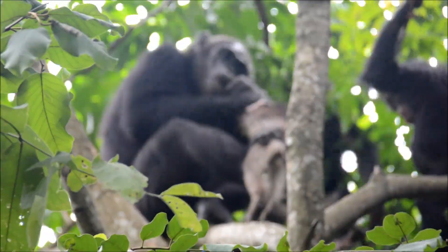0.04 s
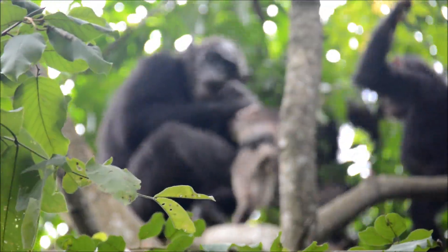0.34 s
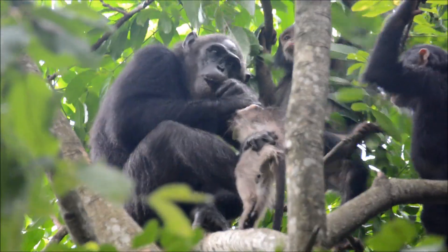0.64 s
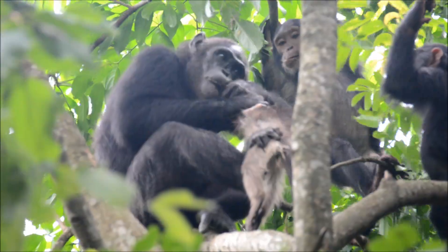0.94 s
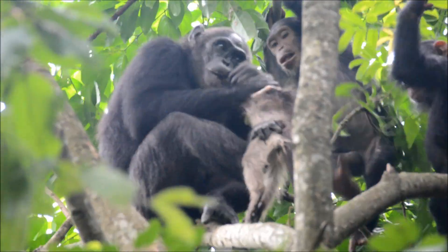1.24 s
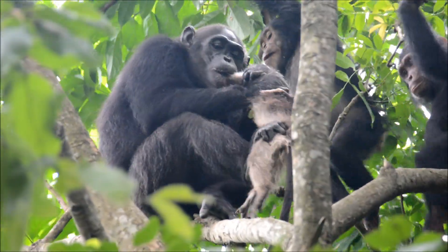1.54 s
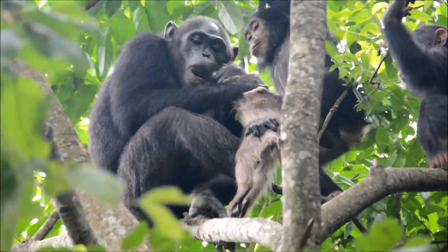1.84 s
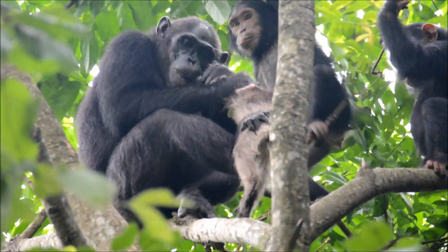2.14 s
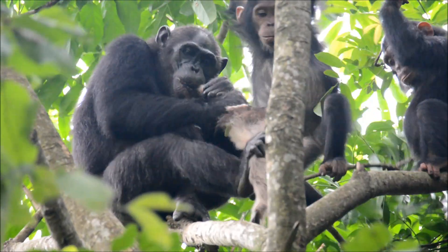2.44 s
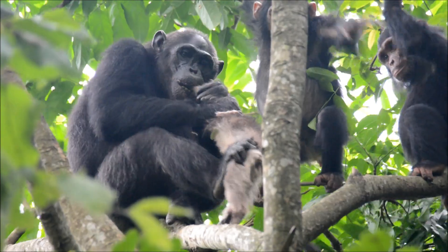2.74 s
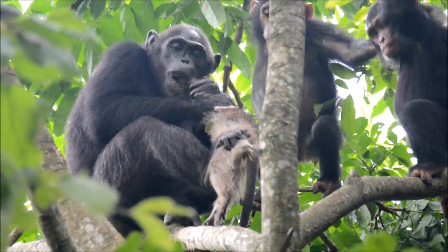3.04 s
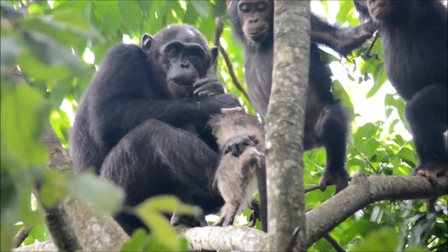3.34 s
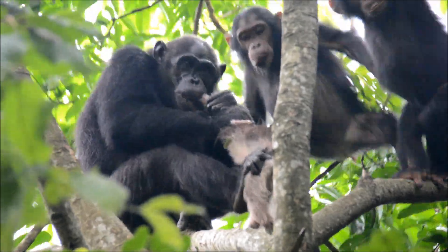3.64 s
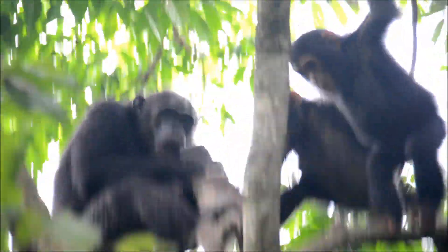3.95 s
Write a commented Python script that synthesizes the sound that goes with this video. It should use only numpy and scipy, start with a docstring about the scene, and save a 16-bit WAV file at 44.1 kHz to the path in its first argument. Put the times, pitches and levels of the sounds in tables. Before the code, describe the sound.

Twigs crack and foliage swishes under clambering chimpanzees, over high, pulsing forest insects.

```python
"""Chimpanzees clambering in a forest tree

Leaves rustle and crackle as the animals shift their weight. Twigs snap in bursts of tearing fibres
and a branch knocks now and then, both with a short tail scattered by the trees. Behind them the far
canopy stirs, insects buzz in overlapping phrases near 6 and 7 kHz, and a distant bird whistles."""
import sys
import numpy as np
from scipy import signal
from scipy.fft import rfft, irfft, next_fast_len
from scipy.io import wavfile
from scipy.ndimage import uniform_filter1d, map_coordinates

SR = 44100
rng = np.random.default_rng(int(sys.argv[2]) if len(sys.argv) > 2 else 0)


def inscribe(sig):
    """Save sig as 16-bit PCM at rate SR to the path in sys.argv[1].

    A 1-D sig is mono; a 2-D sig holds one channel per row.
    Samples are clipped to [-1, 1] before scaling.
    """
    pcm = np.round(np.clip(np.atleast_2d(sig).T, -1, 1) * 32767)
    wavfile.write(sys.argv[1], SR, pcm.astype(np.int16))


N = 176400


def amp(db):
    """Decibels to gain."""
    return 10 ** (np.asarray(db) / 20)


def unit(x):
    """Scale to rms 1."""
    return x / np.sqrt(np.mean(x ** 2) + 1e-20)


def along(points, hz):
    """Read a curve of (Hz, value) points on a log frequency axis."""
    freqs, values = np.transpose(points)
    return np.interp(np.log(hz + 1), np.log(freqs + 1), values)


def wobble(rate):
    """A smooth random curve with `rate` knots a second."""
    return map_coordinates(rng.standard_normal(2000), [np.arange(N) * rate / SR], mode="mirror")


def filtered(x, response):
    """Equalise x with a gain given as a function of Hz."""
    n = x.shape[-1]
    size = next_fast_len(n + 8192)
    return irfft(rfft(x, size) * response(np.fft.rfftfreq(size, 1 / SR)), size)[..., :n]


# Stereo image of the near tree. Each row: frequency in Hz, left-right likeness from 0 to 1.
TREE_LIKENESS = [(60, .75), (200, 0.94), (500, 0.98), (1200, 1), (2500, 1), (5500, .87), (9000, 0.74),
                 (14000, 0.42)]


def spread(pair, spectrum, tilt_db=0, likeness=TREE_LIKENESS):
    """Two unrelated signals become coloured, partly alike stereo of rms 1."""
    angle = lambda hz: np.arccos(np.clip(along(likeness, hz), -1, .995)) / 2
    colour = lambda hz: amp(along(spectrum, hz) + tilt_db * np.log2(1 + hz / 500))
    mid, side = filtered(pair, lambda hz: colour(hz) * [np.cos(angle(hz)), np.sin(angle(hz))])
    return unit(np.array([mid + side, mid - side]))


def leaf_contacts(spectrum, likeness, patchy_db, crackles_per_s=1500, crackle_db=-7):
    """Countless leaves touching: a patchy rush with single crackles standing out."""
    hits = rng.random(N) < crackles_per_s / SR
    sizes = amp(3 * np.minimum(rng.exponential(size=N), 3))
    crackles = unit(hits * sizes * rng.choice([-1, 1], (2, N)))
    bands = signal.stft(rng.standard_normal((2, N)) + amp(crackle_db) * crackles, nperseg=512)[2]
    patches = uniform_filter1d(rng.standard_normal(bands.shape[1:]), size=4, axis=0)  # across pitch
    patches = unit(uniform_filter1d(patches, size=7, axis=1))  # across time
    depth_db = patchy_db / (1 + np.fft.rfftfreq(512, 1 / SR)[:, None] / 5000)  # smoother in the treble
    rush = signal.istft(bands * amp(depth_db * patches), nperseg=512)[1][:, :N]
    return spread(rush, spectrum, likeness=likeness)


def phrases(rows, width_hz, rise_hz_per_s, skirt_db, edge, side_db=-12.5):
    """Fuzzy rising tones of narrow noise that swell and fade; a higher edge gates them harder."""
    out, t = np.zeros((2, N)), np.arange(N) / SR
    core = lambda f: np.exp(-.25 * (f / width_hz) ** 2)
    skirt = lambda f: amp(skirt_db) * np.exp(-.5 * (f / width_hz / 4) ** 2)
    for middle, length, hz, db in rows:
        first = max(0, round((middle - .5) * SR))
        offset = t[first:first + SR] - middle
        fuzz = filtered(rng.standard_normal((2, 2, SR)), lambda f: core(f) + skirt(f))
        fuzz = unit(fuzz)[..., :len(offset)]
        phase = 2 * np.pi * (hz * offset + rise_hz_per_s * offset ** 2 / 2)
        swell = amp(db) * np.exp(-np.abs(2 * offset / length) ** edge)
        mid, side = swell * (fuzz[0] * np.cos(phase) + fuzz[1] * np.sin(phase))
        out[:, first:first + SR] += [mid + amp(side_db) * side, mid - amp(side_db) * side]
    return out


# Stereo image of the surrounding forest. Each row: frequency in Hz, left-right likeness from 0 to 1.
FAR_LIKENESS = [(60, 0.86), (200, 0.48), (500, 0.56), (1200, 0.73), (4500, 0.56), (9000, 0.54),
                (15000, 0.13)]
# Tone of the far canopy. Each row: frequency in Hz, relative level in dB.
CANOPY_EQ = [(25, -44), (55, -54), (75, -47), (90, -9.5), (108, -22), (135, -13), (200, -12), (350, -7),
             (650, -3.5), (1100, -2.5), (2000, -2.5), (3200, -2.5), (4700, -6.5), (8500, -9.5),
             (12000, -12), (15800, -12.5)]


def far_canopy():
    """A quiet, gently wavering bed of distant leaves."""
    return amp(-54 + .9 * wobble(16)) * leaf_contacts(CANOPY_EQ, FAR_LIKENESS, patchy_db=1.43)


# Tone of the distant insects. Each row: frequency in Hz, relative level in dB.
CHORUS_EQ = [(4000, -48), (5200, -15.5), (5700, -3), (6200, -7), (6900, -10), (7500, -20), (8300, -29)]


def insect_chorus():
    """Distant insects merge into a wavering band of hiss."""
    hiss = spread(rng.standard_normal((2, N)), CHORUS_EQ, likeness=FAR_LIKENESS)
    return amp(-55 + 1.5 * wobble(5.8)) * hiss


# Bird calls. Each row: midpoint in seconds, length in seconds, pitch in Hz, level in dB.
BIRD_CALLS = [(.055, 0.17, 3170, -56), (.657, .022, 2305, -50), (1.29, 0.2, 3200, -64.5),
              (3.187, 0.044, 2920, -49)]


def far_bird():
    """Thin rising whistles, blurred by distance."""
    return phrases(BIRD_CALLS, width_hz=34, rise_hz_per_s=900, skirt_db=-32, edge=3.5)


# Insect buzzes. Each row: midpoint in seconds, length in seconds, pitch in Hz, level in dB.
BUZZ_PHRASES = [(.03, 0.056, 5780, -56.5), (.31, 0.29, 5740, -50), (.46, 0.1, 6140, -58),
                (.75, .17, 5770, -56), (.985, 0.12, 5830, -49.5), (1.17, 0.28, 5710, -52),
                (1.42, .12, 6100, -58), (1.63, 0.25, 5750, -50.5), (1.79, 0.15, 5650, -56),
                (2.19, 0.24, 5730, -51), (2.42, 0.24, 5790, -52.5), (2.74, 0.17, 5700, -50),
                (2.88, 0.084, 5640, -56), (3.02, 0.14, 6010, -50), (3.23, 0.21, 5770, -49),
                (3.46, 0.21, 5780, -61), (3.88, 0.23, 5740, -50.5)]
# Insect lisps. Each row: midpoint in seconds, length in seconds, pitch in Hz, level in dB.
LISP_PHRASES = [(.14, .17, 7200, -57.5), (.35, .25, 6770, -58), (.64, 0.14, 7200, -57),
                (.84, 0.16, 6900, -56), (1.08, 0.16, 7200, -57.5), (1.32, 0.13, 6780, -56.5),
                (1.49, 0.22, 7120, -56), (1.85, 0.18, 6900, -59), (2.39, 0.25, 6920, -53),
                (2.87, .16, 6940, -52.5), (3.27, 0.17, 6820, -52.5), (3.76, 0.22, 7060, -54.5)]


def near_insects():
    """Lightly fluttering buzzes overlap with higher, hissier lisps."""
    buzz = phrases(BUZZ_PHRASES, width_hz=74, rise_hz_per_s=478, skirt_db=-5.5, edge=4.6)
    lisp = phrases(LISP_PHRASES, width_hz=300, rise_hz_per_s=42, skirt_db=-36, edge=3)
    flutter = amp(.3 * wobble(110))
    return buzz * flutter + lisp


# Forest reverb. Each row: frequency in Hz, seconds to fall 60 dB.
FOREST_DECAY = [(200, 0.75), (2000, 0.53), (12000, 0.38)]


def forest_reverb(x):
    """Trunks and leaves scatter a short tail that darkens as it dies."""
    noise = spread(rng.standard_normal((2, SR // 2)), [(100, 0), (10000, 0)])
    hz, t, bands = signal.stft(noise, SR, nperseg=256)
    decay = amp(-60 * t / along(FOREST_DECAY, hz)[:, None])
    tail = signal.istft(bands * decay, SR, nperseg=256)[1]
    return signal.fftconvolve(x.mean(axis=0)[None], tail / np.linalg.norm(tail[0]), axes=1)[:, :N]


# Branch knocks. Each row: start in seconds, level in dB, pitch in Hz, seconds to fall 60 dB.
BRANCH_HITS = [(0.801, -45, 1320, 0.03), (0.859, -50.5, 1120, 0.069), (1.219, -47, 1040, .035),
               (1.662, -41.5, 988, 0.11), (1.892, -49.5, 530, 0.094), (2.395, -43, 1515, 0.039),
               (2.672, -48.5, 683, 0.058), (2.695, -49, 1120, 0.04), (3.288, -41.5, 1363, 0.052)]
# Resonances of a branch. Each row: multiple of the pitch, relative level in dB.
BRANCH_MODES = [(0.999, 1.5), (1.9, -4), (2.74, -1)]


def branch_knocks(jitter_radians=.19, attack_s=.00054):
    """Thick wood rings briefly and a little roughly, its upper modes dying first."""
    out, t = np.zeros((2, N + SR)), np.arange(SR // 4) / SR
    attack = 1 - np.exp(-t / attack_s)
    for start, db, hz, t60 in BRANCH_HITS:
        for ratio, mode_db in BRANCH_MODES:
            phase = ratio * (2 * np.pi * hz * t + jitter_radians * wobble(373)[:len(t)])
            decay = amp(db + mode_db - 60 * t * ratio / t60)
            out[:, round(start * SR):][:, :len(t)] += attack * decay * np.sin(phase)
    return out[:, :N]


# Twig snaps. Each row: start in seconds, level in dB, treble tilt in dB per octave,
# seconds to fall 60 dB.
TWIG_BREAKS = [(.1935, -36.5, 1, .014), (.197, -46.5, -3.5, 0.084), (.2985, -38.5, -1.5, .015),
               (.352, -43, 5.5, 0.012), (0.456, -47, 0, .04), (.463, -44, -2, 0.031),
               (0.7481, -38.5, 0.5, 0.019), (.788, -39, 2, 0.03), (.792, -32, 2.5, 0.029),
               (.802, -31.5, -0.5, 0.024), (1.4225, -39.5, 0, 0.031), (1.5045, -37, -2, 0.02),
               (1.443, -47, -8, 0.073), (1.5568, -45, -3, .02), (1.662, -42, -2, .025),
               (1.6865, -38.5, -1.5, 0.034), (1.691, -34, -.5, 0.059), (1.719, -33.5, 12, 0.11),
               (1.888, -30.5, 6, 0.11), (1.974, -40, 0.5, 0.45), (2.201, -39, -1.5, 0.039),
               (2.505, -42.5, 0.5, 0.19), (2.555, -38.5, 5, 0.024), (2.668, -44, -6.5, .08),
               (2.718, -40, 2, 0.033), (2.972, -39, -3, 0.015), (3.645, -45, 5, .03), (3.683, -40, 7, .07)]
# Tone of a snap before its tilt. Each row: frequency in Hz, relative level in dB.
TWIG_EQ = [(40, -40), (200, -14), (700, -7), (1500, 2.5), (3000, 3), (6000, 2), (11000, -4), (13300, -1),
           (16000, -9.5)]


def twig_snaps(roughness_db=2):
    """Twigs break in short, ragged bursts of tearing fibres."""
    out, t = np.zeros((2, N + SR)), np.arange(SR // 4) / SR
    for start, db, tilt_db, t60 in TWIG_BREAKS:
        fibres = rng.standard_normal((2, len(t))) * amp(roughness_db * wobble(900)[:len(t)])
        decay = amp(db - 60 * t / t60)
        out[:, round(start * SR):][:, :len(t)] += spread(fibres, TWIG_EQ, tilt_db) * decay
    return out[:, :N]


# Fader moves of the rustle. Each row: time in seconds, body fader in dB, crisp fader in dB.
RUSTLE_FADERS = [(1.66, -63, -66), (1.7, -44.5, -49), (1.78, -48.5, -54.5), (1.88, -48, -54.5),
                 (1.93, -45.5, -46), (1.99, -47, -58), (2.09, -49.5, -55), (2.2, -48, -55),
                 (2.26, -52, -55.5), (2.32, -50, -56), (2.4, -52, -57.5), (2.54, -49, -56.5),
                 (2.6, -56, -60), (2.65, -52.5, -61), (2.68, -48, -54), (2.8, -57.5, -61),
                 (2.87, -48.5, -54.5), (2.95, -52.5, -58), (3.13, -52.5, -61), (3.19, -47, -56),
                 (3.24, -48, -52.5), (3.28, -44.5, -50.5), (3.35, -47, -57), (3.49, -47, -56),
                 (3.58, -52, -61.5), (3.69, -54, -57), (3.76, -52, -63.5), (3.94, -55, -58.5),
                 (4, -55.5, -62)]
# Tone of the rustle's body. Each row: frequency in Hz, relative level in dB.
BODY_EQ = [(30, -54), (80, -33), (170, -21.5), (340, -7.5), (430, -9.5), (700, 0), (800, -6.5), (950, 0.5),
           (1250, 0), (1530, 3), (1900, 0.5), (3050, 1), (5000, -2.5), (7500, -5.5), (11000, -19),
           (16000, -41)]
# Tone of its crisp top. Each row: frequency in Hz, relative level in dB.
CRISP_EQ = [(1000, -25), (4000, -26), (8000, 2.5), (10500, 1.5), (13500, 0), (15800, -0.5)]


def leaf_rustle(body_trim_db=1, crisp_trim_db=3.5):
    """Leaves swish as the animals shift their weight on the branches."""
    times, body_db, crisp_db = np.transpose(RUSTLE_FADERS)
    t = np.arange(N) / SR
    shake_db = .7 * wobble(35)
    fader = lambda db: amp(np.interp(t, times, db, left=-100) + shake_db)
    body = fader(body_db + body_trim_db) * leaf_contacts(BODY_EQ, TREE_LIKENESS, patchy_db=2)
    crisp = fader(crisp_db + crisp_trim_db) * leaf_contacts(CRISP_EQ, TREE_LIKENESS, patchy_db=3)
    return body + crisp


def scene(reverb_db=-7.5, lean_db=.28):
    """The near tree over the forest bed, leaning slightly left; only the wood feeds the reverb."""
    low_cut = signal.butter(2, 170, "high", fs=SR, output="sos")
    wood = signal.sosfilt(low_cut, twig_snaps() + branch_knocks())
    tree = wood + amp(reverb_db) * forest_reverb(wood) + leaf_rustle()
    bed = far_canopy() + near_insects() + insect_chorus() + far_bird()
    return (tree + bed) * amp([[lean_db], [-lean_db]])


def record(dry, top_hz=15950):
    """A brick-wall high cut on the whole mix."""
    return filtered(dry, lambda hz: hz < top_hz)


dry = scene()
out = record(dry)
inscribe(out)
```